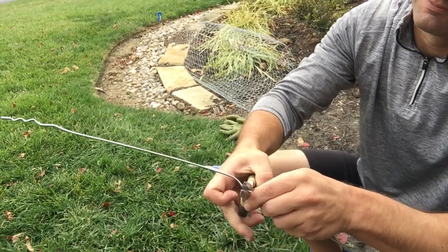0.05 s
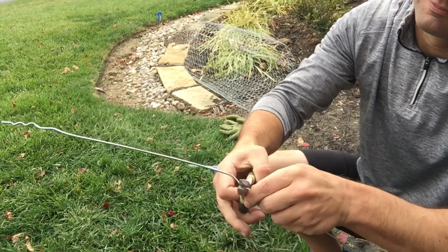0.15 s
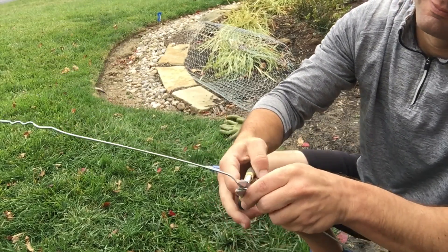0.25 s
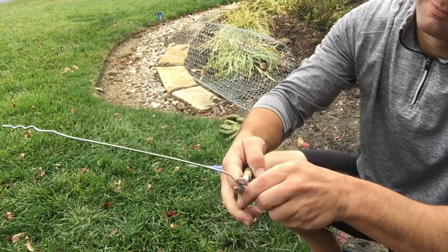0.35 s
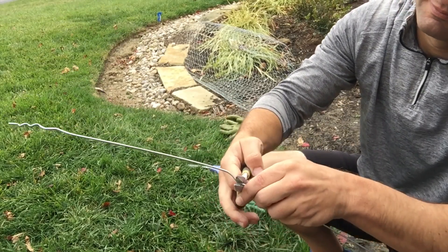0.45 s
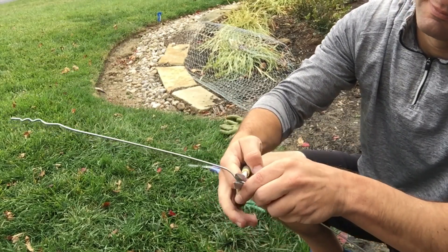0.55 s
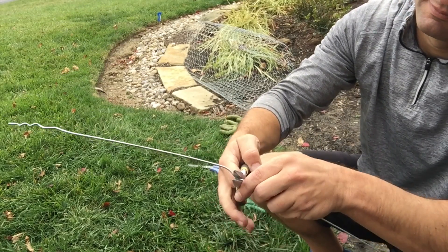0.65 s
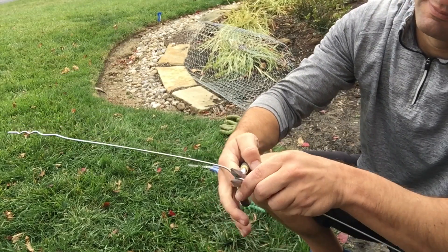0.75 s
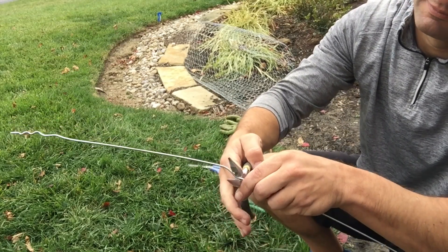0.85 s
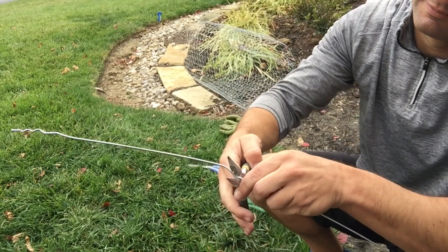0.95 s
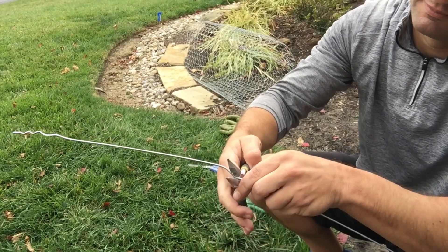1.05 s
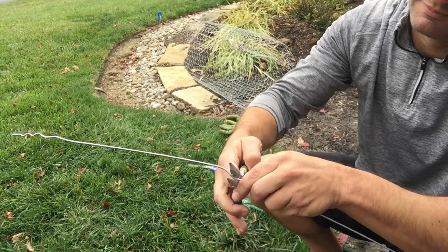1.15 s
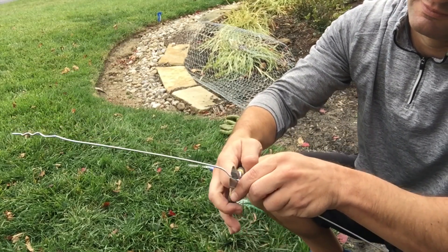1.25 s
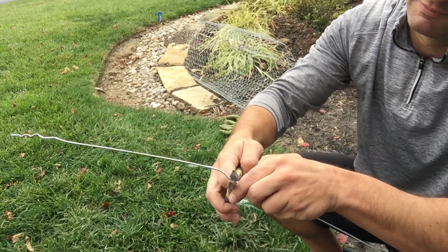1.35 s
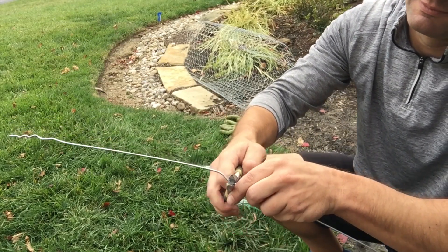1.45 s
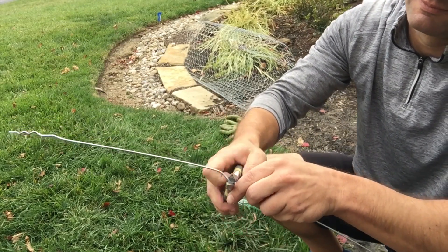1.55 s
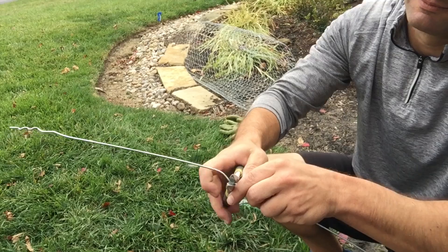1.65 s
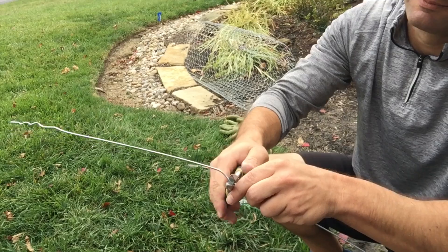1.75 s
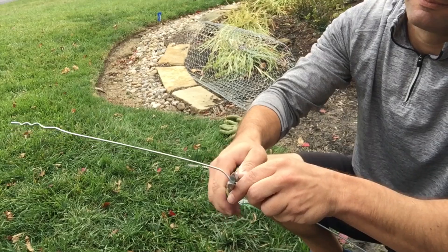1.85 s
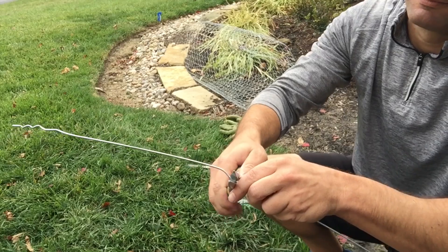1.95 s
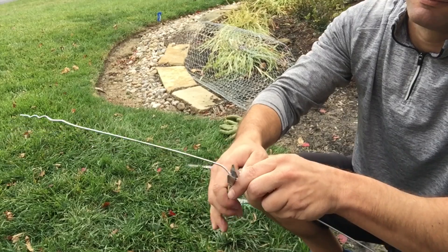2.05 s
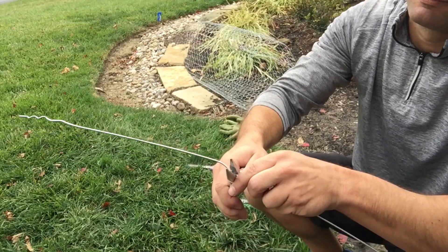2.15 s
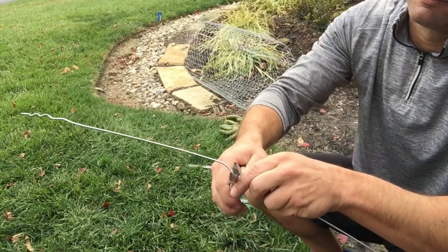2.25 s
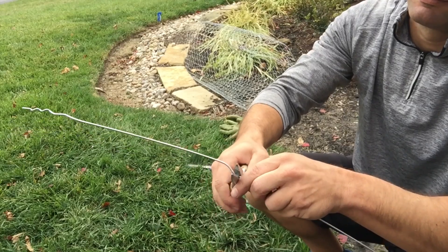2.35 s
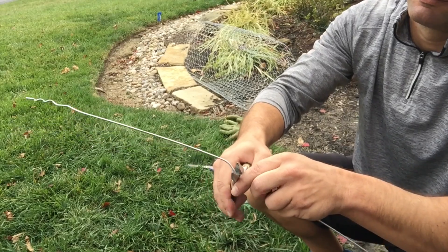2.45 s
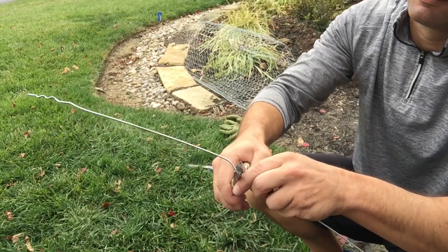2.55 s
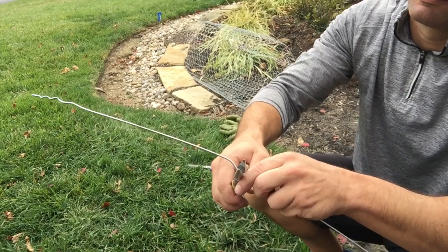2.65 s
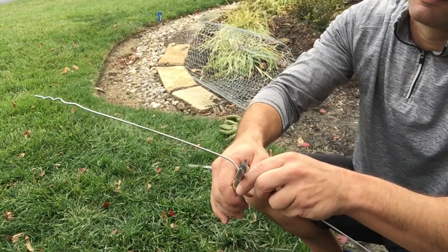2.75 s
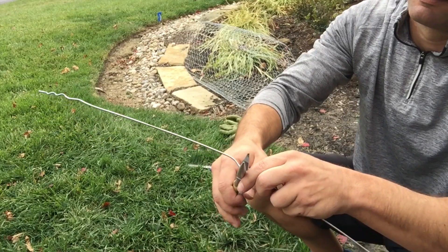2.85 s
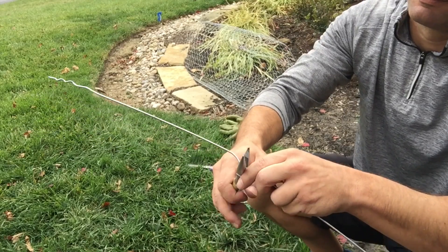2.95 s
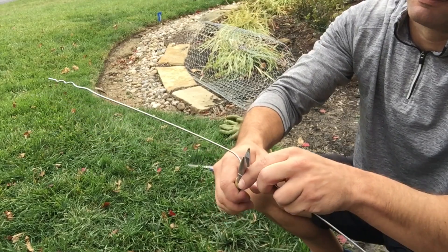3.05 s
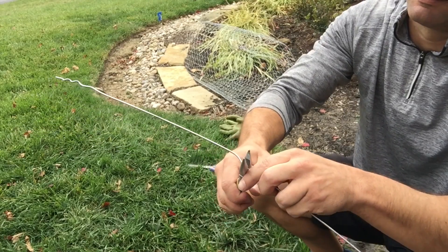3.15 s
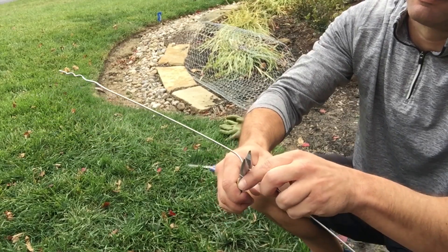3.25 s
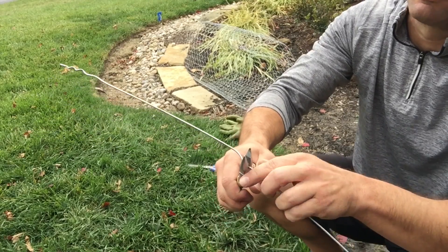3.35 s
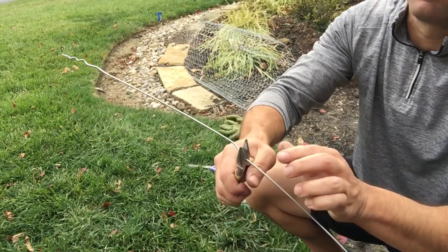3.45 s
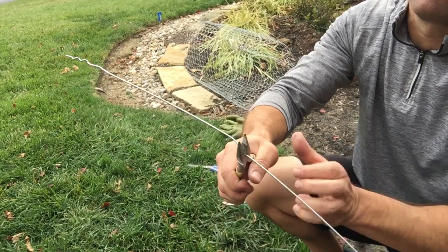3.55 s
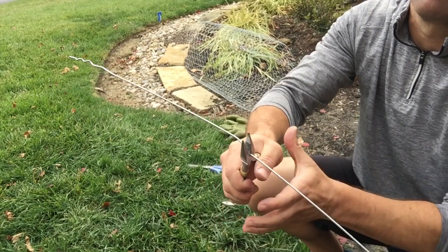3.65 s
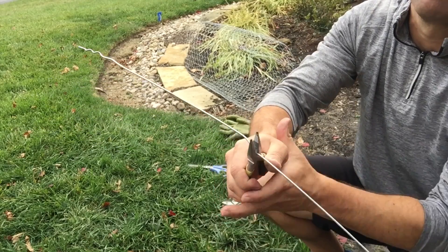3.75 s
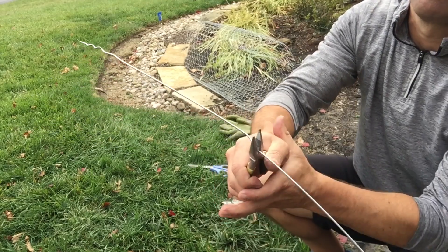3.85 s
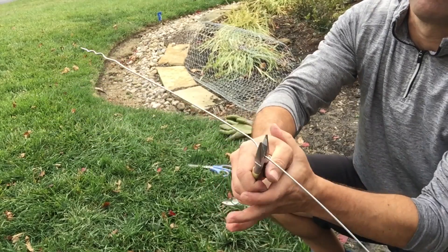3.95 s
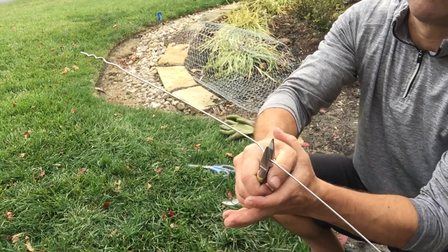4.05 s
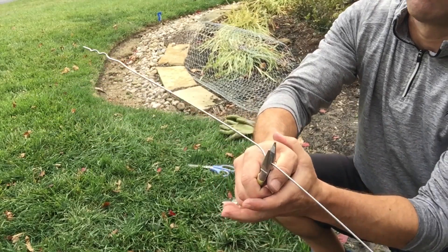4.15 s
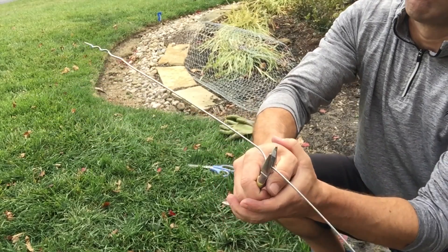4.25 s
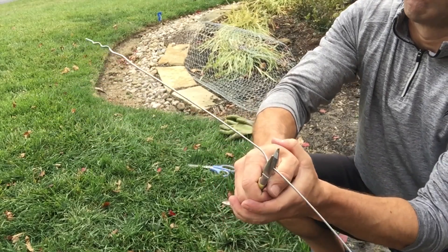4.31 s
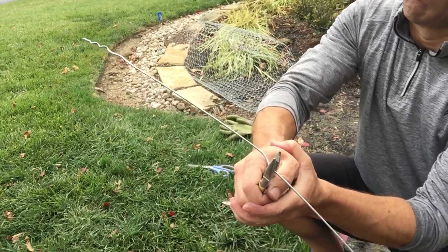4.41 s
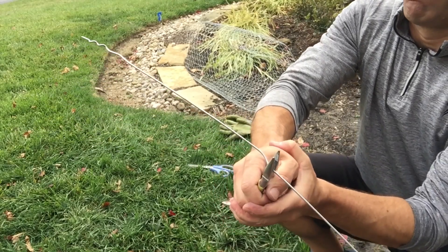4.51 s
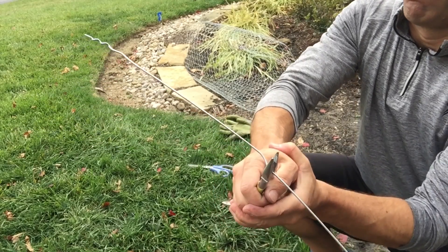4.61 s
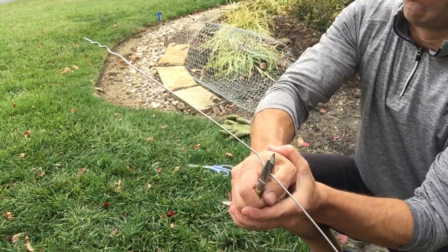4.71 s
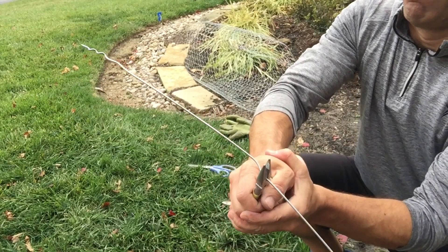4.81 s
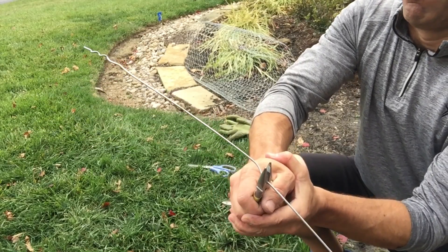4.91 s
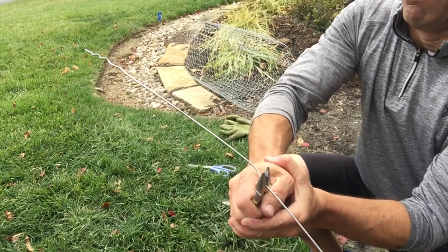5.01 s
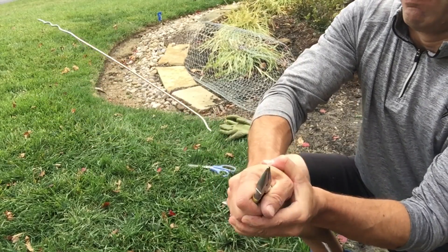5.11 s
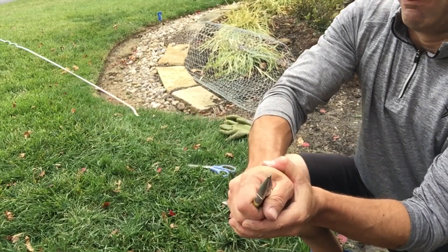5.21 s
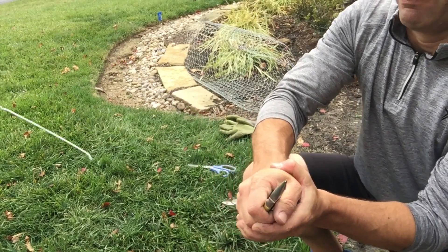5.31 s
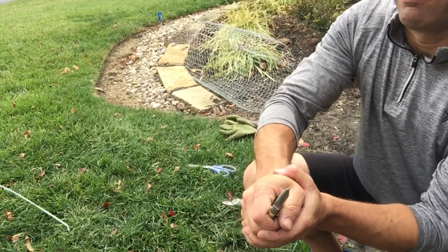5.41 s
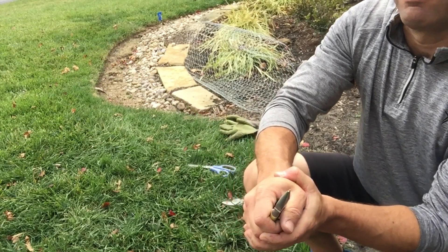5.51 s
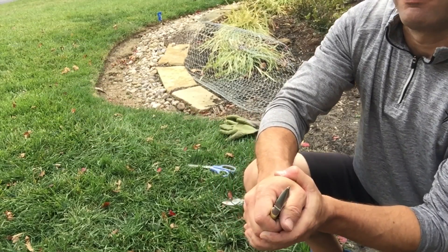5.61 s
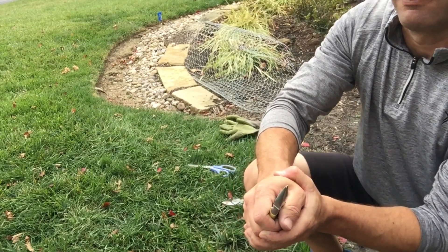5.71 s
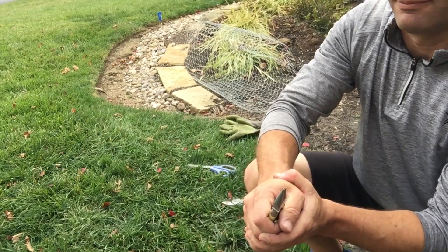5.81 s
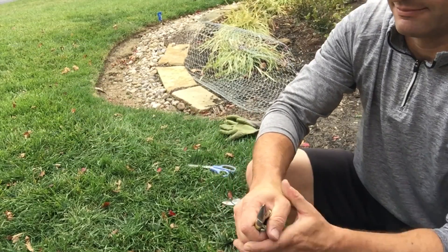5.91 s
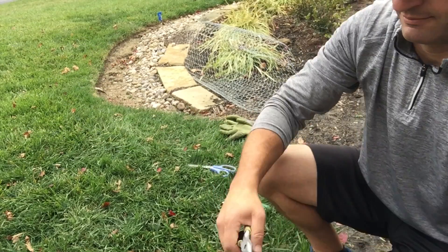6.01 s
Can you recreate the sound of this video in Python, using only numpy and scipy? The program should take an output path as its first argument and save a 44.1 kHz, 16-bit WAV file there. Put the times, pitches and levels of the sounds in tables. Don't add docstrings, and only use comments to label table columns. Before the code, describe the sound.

For the first 4.8 seconds there is only a quiet outdoor bed: a far mower's low, steady hum with a gently beating, swelling tone, soft air rumble and hiss, and very faint high cricket chirps several times a second. Leaves stir briefly at the start. Around 3.2 to 4.5 s, faint rapid mower valve ticks come forward, and the engine slowly sags in pitch. At 4.82 s a short double wind thump bumps the small microphone. Tiny ticks and a slight squeak start at 5.06 s, then at 5.08 s pliers snap the steel wire: a very loud, close, clipped crack with a short jolt, buzz and rattle. High glassy ringing swells briefly and is damped by about 5.5 s. Light ticks at 5.50 s lead to a crisp click at 5.57 s as the wire end lands in grass, with slight rustling. Hum and leaves continue to 6 s.

```python
import sys
import numpy as np
from scipy import signal
from scipy.fft import rfft, irfft
from scipy.io import wavfile

SR = 44100
rng = np.random.default_rng(int(sys.argv[2]) if len(sys.argv) > 2 else 0)


def makeup_ratio(level_db):
    decades = np.asarray(level_db, float) / 20
    return 10 ** decades


def inscribe(sig):
    pcm = np.round(np.clip(np.atleast_2d(sig).T, -1, 1) * 32767)
    wavfile.write(sys.argv[1], SR, pcm.astype(np.int16))


N = 267687


def rms_one(x):
    return x / np.sqrt(np.mean(x ** 2) + 1e-20)


def in_time(rows):
    s, *columns = np.transpose(rows)
    return [np.interp(np.arange(N) / SR, s, c) for c in columns]


def drift(rate):
    knots = rng.standard_normal(int(N / SR * rate) + 2)
    return np.interp(np.arange(N) / SR * rate, np.arange(len(knots)), knots)


def step(t, s, width_s):
    return .5 + .5 * np.tanh((t - s) / width_s)


def bump(s, half_s):
    return np.exp(-((np.arange(N) / SR - s) / half_s) ** 4)


def swell(db, swing_db, period_s, loudest_s):
    return db + swing_db * np.cos(2 * np.pi * (np.arange(N) / SR - loudest_s) / period_s)


def coloured(x, spectrum):
    hz, db = np.transpose(spectrum)
    log_hz = np.log(np.arange(len(x) // 2 + 1) * SR / len(x) + 1)
    gain = makeup_ratio(np.interp(log_hz, np.log(hz), db))
    return rms_one(irfft(rfft(x) * gain, len(x)))


def band(x, lo_hz, hi_hz):
    return signal.sosfilt(signal.butter(2, [lo_hz, hi_hz], "band", fs=SR, output="sos"), x)


def add(out, s, sound):
    i = int(round(s * SR))
    out[i:i + len(sound)] += sound[:N - i]


def ping(hz, t60, rise_s):
    t = np.arange(int(1.5 * t60 * SR) + 8) / SR
    return np.sin(2 * np.pi * hz * t) * makeup_ratio(-60 * t / t60) * (1 - np.exp(-t / rise_s))


def steel(modes, rise_s, lasting, flutter_db):
    out, t = np.zeros(SR), np.arange(SR) / SR
    for hz, db, t60 in modes:
        ring = ping(hz, t60 * lasting, rise_s)[:SR]
        sway = np.interp(t[:len(ring)] * 28, np.arange(30), rng.standard_normal(30))
        polarity = (-1) ** int(hz)
        add(out, 0, polarity * makeup_ratio(db + flutter_db * sway) * ring)
    return out


def ambience():
    # frequency in Hz, density in dB per Hz.
    air = [(20, -60.5), (40, -21.5), (60, -8.5), (141, -8), (200, -14), (293, -22), (354, -31.5),
           (900, -39.5), (2150, -42), (6800, -48.5), (7500, -57), (11000, -53.5), (15600, -55),
           (16100, -83)]
    # middle in seconds, half length in seconds, lift in dB.
    gusts = [
        (.2, 0.34, 8),
        (3.9, 0.97, 1),
        (5.7, .7, 4.5),
    ]
    t = np.arange(N) / SR
    noise = coloured(rng.standard_normal(N), air)
    low = signal.sosfiltfilt(signal.butter(2, 450, fs=SR, output="sos"), noise)
    high = signal.sosfiltfilt(signal.butter(2, 9500, "high", fs=SR, output="sos"), noise)
    rumble_db = -48 - 0.41 * t + 0.51 * drift(3.7)
    hiss_db = -49.5 + .2 * (t - 3) + 0.35 * drift(8)
    leaves_db = -54.5 + sum(db * bump(s, half_s) for s, half_s, db in gusts) + 0.62 * drift(4.72)
    middle = (noise - low - high) * makeup_ratio(hiss_db)
    patches = np.zeros(N)
    for hz in 500 * 1.26 ** np.arange(11):
        patches += (makeup_ratio(1.8 * drift(9)) - 1) * band(middle, hz, 1.26 * hz)
    return low * makeup_ratio(rumble_db) + middle + patches + high * makeup_ratio(leaves_db)


def wind():
    # start in seconds, level in dB, pitch in Hz, cycles to die.
    puffs = [
        (4.824, -21.5, 170, 11),
        (4.822, -25.5, 83, 6.6),
        (4.855, -19, 138.6, 10.2),
        (4.858, -38, 207, 15),
    ]
    out = np.zeros(N)
    for s, db, hz, cycles in puffs:
        add(out, s, makeup_ratio(db) * ping(hz, cycles / hz, 0.0066))
    return out


def crickets():
    # middle in seconds, level in dB.
    chirps = [(.135, -69), (.41, -72), (.70, -80), (.92, -84), (1.18, -79), (1.51, -75), (1.815, -73),
              (2.08, -74), (2.445, -73), (2.83, -72), (3.15, -71), (3.50, -71), (3.68, -71), (3.951, -73),
              (4.15, -72), (4.43, -70), (4.68, -71), (4.965, -74), (5.69, -70), (5.96, -75)]
    chirp_s, stroke_s = .07, .0116
    out, t = np.zeros(N), np.arange(int(chirp_s * SR)) / SR
    strokes = np.sin(np.pi * t / stroke_s) ** 2 * np.sin(np.pi * t / chirp_s) ** 0.48
    for s, db in chirps:
        hz = 8700 + 200 * t / chirp_s + 30 * rng.normal() + 110 * drift(300)[:len(t)]
        add(out, s - chirp_s / 2, makeup_ratio(db) * strokes * np.sin(2 * np.pi * np.cumsum(hz) / SR))
    chorus = rms_one(band(rng.standard_normal(N), 8100, 9300))
    return out + makeup_ratio(-83.0 + 1.2 * drift(14)) * chorus


def deck():
    # frequency in Hz, half width in Hz, level in dB.
    deck_modes = [(1253, 50, -86), (1500, 40, -85), (1720, 45, -83), (1950, 35, -85), (2450, 50, -86),
                  (3080, 40, -85)]
    noise = rng.standard_normal(N)
    out = np.zeros(N)
    for hz, width, db in deck_modes:
        out += makeup_ratio(db + 4.5 * drift(4)) * rms_one(band(noise, hz - width, hz + width))
    return out


def valves(turns):
    # frequency in Hz, half width in Hz, level in dB.
    casing_modes = [(1300, 110, -2.5), (1737, 390, 4.5), (1930, 76, -12), (2490, 150, -5), (2830, 130, 1),
                    (3840, 230, 2), (4390, 240, 1.5), (5000, 380, -12.5)]
    # middle in seconds, half length in seconds, lift in dB, pitch in Hz.
    spells = [
        (3.5, 0.38, 21.5, 6400),
        (4.047, 0.16, 22, 5950),
        (4.384, 0.15, 25, 5950),
    ]
    bright_db = -86 + sum(db * bump(s, half_s) for s, half_s, db, _ in spells)
    bright_hz, = in_time([(s, hz) for s, _, _, hz in spells])
    tick_turn = .19
    since = (turns - tick_turn) % 1
    puff = np.minimum(since / 0.034, 1) * np.exp(-since / 0.21)
    turn_number = (turns + 1 - tick_turn).astype(int)
    uneven = makeup_ratio(2 * rng.standard_normal(400).clip(-2, 1.5))[turn_number]
    noise = rng.standard_normal(N) * puff * uneven
    casing = np.zeros(N)
    for hz, width, db in casing_modes:
        casing += makeup_ratio(db + 2.5 * drift(9)) * rms_one(band(noise, hz - width, hz + width))
    bright = rms_one(band(noise, 18, 350)) * np.sin(2 * np.pi * np.cumsum(bright_hz) / SR)
    bright += .3 * rms_one(band(noise, 4000, 5200))
    return makeup_ratio(-69.5 - 15.0) * casing + makeup_ratio(bright_db - 10.5) * bright


def mower():
    # time in seconds, speed in turns per second.
    engine_speed = [
        (0, 26.97),
        (.6, 27.03),
        (1.1, 27.08),
        (1.5, 27.0),
        (2.05, 26.72),
        (2.5, 26.92),
        (3.5, 26.85),
        (4.5, 26.55),
        (6.1, 25.97),
    ]
    # time in seconds, level in dB.
    blade_level = [(0, -46), (.6, -42), (1.15, -40.5), (1.7, -41.5), (2.05, -46.5), (2.4, -57.5),
                   (2.75, -42), (3.3, -37), (3.65, -38), (4.2, -43.5), (4.55, -42), (5.2, -51.5),
                   (5.6, -44), (6.1, -54)]
    order_swells = {2: (-62, 2.5, 12, 3), 3: (-64.5, 5.5, 5.0, 3), 4: (-53.5, 3.5, 2, 2.4),
                    5: (-49, 1.5, 4.5, 4), 6: (-58, 2.5, 2, 1.5)}
    # level in dB, swing in dB, period in seconds, loudest time in seconds.
    octave_swell = (-65, 4.5, 3.0, 0.08)
    order_lag = {2: .1, 3: 0, 4: .15, 5: .65, 6: .1}
    blade_lag = (.1, .25)
    turns = np.cumsum(in_time(engine_speed)[0]) / SR
    blade = 5.25 * turns
    away_db = -6 * step(np.arange(N) / SR, 4.05, .15)
    blade_db = in_time(blade_level)[0] + 1.0 * drift(2.5)
    out = makeup_ratio(blade_db) * np.cos(2 * np.pi * (blade - blade_lag[0]))
    octave_db = swell(*octave_swell) + .6 * away_db + 2 * drift(14)
    out += makeup_ratio(octave_db) * np.cos(2 * np.pi * (2 * blade - blade_lag[1] + .12 * drift(12)))
    third_db = -79 + 2 * away_db + 4 * drift(3)
    out += makeup_ratio(third_db) * np.cos(2 * np.pi * (3 * blade + .1 * drift(8)))
    for order, level in order_swells.items():
        order_db = swell(*level) + away_db + 1.5 * drift(4)
        out += makeup_ratio(order_db) * np.cos(2 * np.pi * (order * turns - order_lag[order]))
    return np.sqrt(2) * out + valves(turns) + deck()


def rustle():
    # frequency in Hz, density in dB per Hz.
    grass = [(880, -27), (1500, -12), (2010, -12), (6220, -10), (6740, -11), (11500, -6), (15000, -7),
             (16400, -21)]
    # start in seconds, rise in dB per ms, hold in seconds, level in dB.
    brushes = [
        (5.5, 3, .006, -59),
        (5.5, 2, .065, -70),
        (5.565, 9, .002, -51),
        (5.566, 6, 0.036, -61),
        (5.795, 1.7, .01, -74),
        (5.915, 2, .01, -74),
    ]
    grains = rng.standard_normal(N) * makeup_ratio(2.5 * rng.exponential(1, N).clip(0, 4))
    t = np.arange(N) / SR
    level = np.zeros(N)
    for s, rise, hold_s, db in brushes:
        before_db = 1000 * rise * (s - t).clip(0)
        after_db = 650 * (t - s - hold_s).clip(0)
        level += makeup_ratio(db - before_db - after_db)
    return level * coloured(grains, grass)


def knocks():
    # start in seconds, level in dB, pitch in Hz, cycles to die.
    small_knocks = [(5.0600, -45, 13500, 70), (5.0603, -47, 11300, 60), (5.0718, -47, 13600, 70),
                    (5.0718, -38, 11300, 66), (5.102, -25, 2830, 45), (5.1023, -33, 1604, 14),
                    (5.111, -36, 1700, 14), (5.121, -34, 2690, 29), (5.135, -36, 3480, 15),
                    (5.232, -45, 450, 6.1), (5.431, -44, 600, 6.8), (5.431, -42.5, 1300, 6.4),
                    (5.5025, -34, 6420, 10.5), (5.5022, -36, 13700, 25), (5.508, -45, 5000, 8.5),
                    (5.5274, -44, 5200, 8), (5.5275, -38, 10000, 14), (5.576, -49, 9000, 12),
                    (5.585, -44, 4000, 11.5), (5.805, -46, 2200, 12), (5.805, -48, 14500, 20),
                    (5.805, -60, 12000, 21), (6.011, -60, 11000, 20)]
    # start in seconds, level in dB, pitch in Hz, cycles to die.
    landing = [(5.5654, -32, 8500, 8), (5.56596, -16, 12800, 14), (5.5659, -16, 8600, 15),
               (5.5659, -24, 4300, 7), (5.5658, -29, 2200, 12), (5.5659, -27, 3100, 6),
               (5.5659, -28, 6000, 8)]
    # frequency in Hz, peak level in dB, t60 in seconds.
    wire_end = [(6422, -59, 0.12), (8930, -71, 0.8), (10203, -63, 0.55), (10718, -60, 0.13),
                (12170, -62, 0.24), (12670, -62, 0.16), (12917, -60, 0.15), (13542, -56, 0.11),
                (13775, -67, 0.4), (15414, -55, 0.12)]
    # start in seconds, level in dB, share of ring time left.
    end_blows = [
        (5.5022, 1, .7),
        (5.5275, -4, .6),
        (5.566, 0, .2),
    ]
    out = np.zeros(N)
    for s, db, hz, cycles in small_knocks + landing:
        add(out, s, makeup_ratio(db) * ping(hz, cycles / hz, 0.42 / hz))
    end_only = round(5.49 * SR)
    out[end_only:] = band(out[end_only:], 1500, 18000)
    for s, db, lasting in end_blows:
        add(out, s, makeup_ratio(db) * steel(wire_end, rise_s=.0003, lasting=lasting, flutter_db=2))
    return out


def cut():
    # frequency in Hz, density in dB per Hz.
    crack = [(1530, -46.5), (2600, -21), (4360, -23), (5560, -21), (6280, -1.5), (6930, -25.5),
             (7950, -4.5), (9330, -11.5), (11300, -4), (12200, -4), (13800, -6.5), (15400, -8.5),
             (16000, -11)]
    # frequency in Hz, density in dB per Hz.
    rattle = [(590, -61.5), (1000, -30.5), (1570, -6.5), (2370, -14), (2770, -2.5), (3130, -8.5),
              (4060, -15.5), (6000, -13), (7800, -41.5), (13200, -120)]
    # delay in seconds, level in dB, pitch in Hz, t60 in seconds.
    jolt = [(.0005, -8, 1935, .010), (.0005, -7.5, 1700, 0.009), (.0005, -15.5, 1455, 0.0081),
            (.0005, -23.5, 1060, .011), (.001, -21.5, 615, .02), (.002, -36, 400, .02),
            (.002, -32.5, 280, 0.046), (.0025, -22, 188.7, 0.031)]
    # frequency in Hz, peak level in dB, t60 in seconds.
    wire_modes = [(5629, -57, 0.8), (6395, -61, 0.8), (6758, -54, 0.54), (7006, -59, 0.8),
                  (8204, -34, 0.28), (8327, -54, 0.66), (8949, -43, 0.47), (9177, -44, 0.41),
                  (9269, -57, 0.8), (9390, -36, 0.3), (9485, -50, 0.48), (9856, -30, 0.28),
                  (9957, -54, 0.68), (10034, -47, 0.46), (10143, -47, 0.42), (10446, -46, 0.47),
                  (10888, -54, 0.55), (11310, -41, 0.44), (12134, -38, 0.35), (12307, -35, 0.34),
                  (12404, -38, 0.4), (12502, -42, 0.41), (12847, -38, 0.26), (13191, -35, 0.26),
                  (13921, -28, 0.25), (14692, -26, 0.25), (14811, -54, 0.58), (15353, -44, 0.32),
                  (15501, -55, 0.42)]
    # frequency in Hz, peak level in dB, t60 in seconds.
    pliers_modes = [(5633, -62, 2.0), (8949, -58, .7), (12404, -47, .6), (12502, -56, .6),
                    (13921, -56, .65), (14692, -52, .6)]
    # time after the cut in seconds, change in dB.
    fingers = [
        (.28, -9),
        (.34, -7),
    ]
    cut_s = 5.0822
    out, t = np.zeros(N), np.arange(int(.3 * SR)) / SR
    bite = t[:int(.022 * SR)]
    add(out, cut_s - .022, makeup_ratio(-64 + 1000 * bite) * np.sin(2 * np.pi * 8130 * bite))
    burst = 1.2 * (t / .0009) ** 2.4 * np.exp(-t / .00062) + .07 * np.exp(-t / .0045)
    shiver = makeup_ratio(-26) * np.exp(-t / 0.031)
    add(out, cut_s, makeup_ratio(1.5) * coloured(rng.standard_normal(len(t)), crack) * (burst + shiver))
    for delay_s, db, hz, t60 in jolt:
        add(out, cut_s + delay_s, makeup_ratio(db) * ping(hz, t60, 0.83 / hz))
    thicket = [(6200 + 9300 * u, -66 + 6 * u + 12 * v, .22 + .3 * w) for u, v, w in rng.random((100, 3))]
    wire = steel(wire_modes, rise_s=.025, lasting=1.1, flutter_db=4.5)
    wire += makeup_ratio(1.5) * steel(thicket, rise_s=.002, lasting=.95, flutter_db=4.5)
    pliers = steel(pliers_modes, rise_s=.002, lasting=1.15, flutter_db=1.5)
    after = np.arange(SR) / SR
    turn_s = .178
    tumble_db = -4 + 34 * after.clip(0, turn_s) - 7 * step(after, turn_s, .02)
    add(out, cut_s, wire * makeup_ratio(tumble_db))
    add(out, cut_s, pliers * makeup_ratio(sum(db * step(after, s, 0.011) for s, db in fingers)))
    whip = coloured(rng.standard_normal(len(t)), rattle) * makeup_ratio(4.5 * drift(160)[:len(t)])
    whip_db = -36 - 220 * t - 300 * (t - 0.054).clip(0)
    add(out, cut_s, whip * makeup_ratio(whip_db))
    return out


def scene():
    return (ambience() + wind() + crickets() + mower() + rustle() + knocks() + cut())[None]


def band_limit(x):
    return signal.sosfilt(signal.butter(12, 16570, fs=SR, output="sos"), x)


def record(dry):
    capsule = signal.sosfilt(signal.butter(2, 30, "high", fs=SR, output="sos"), dry)
    top_cut = signal.cheby2(10, 60, 16500, fs=SR, output="sos")
    mix = signal.sosfilt(top_cut, np.clip(capsule, -1, 1))
    return band_limit(mix)


dry = scene()
out = record(dry)
inscribe(out)
```